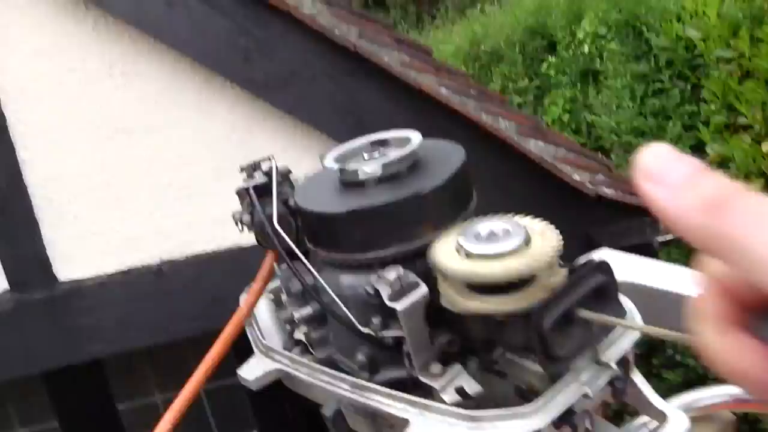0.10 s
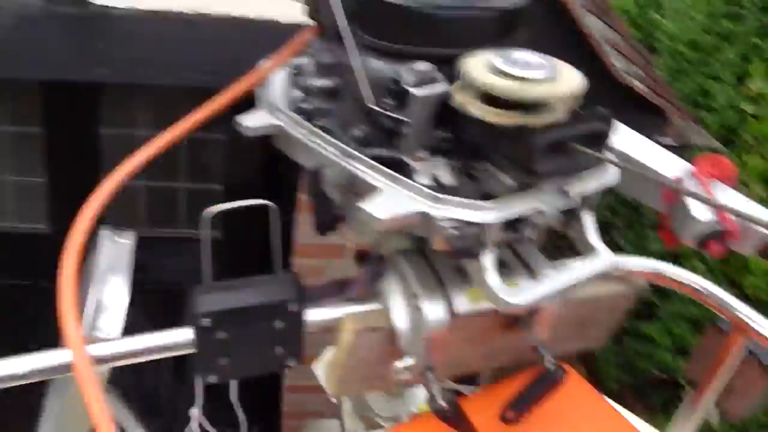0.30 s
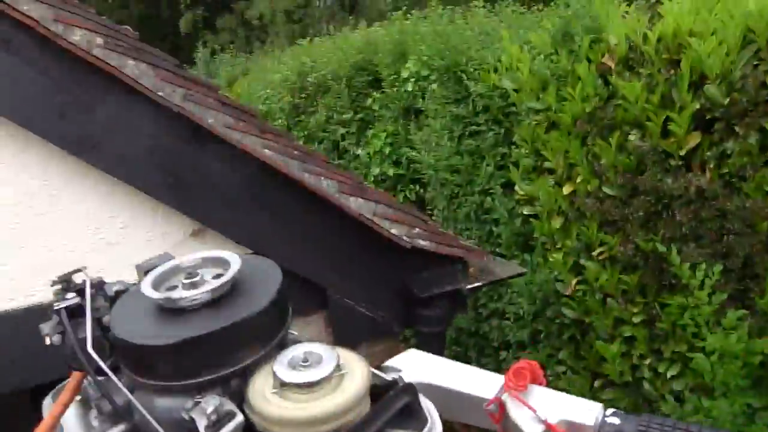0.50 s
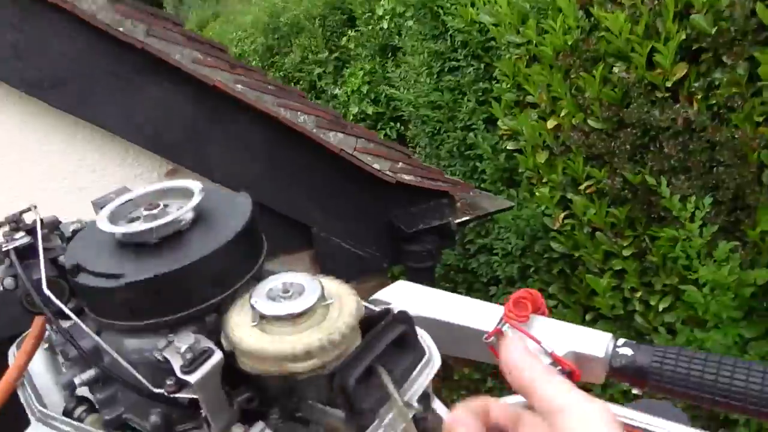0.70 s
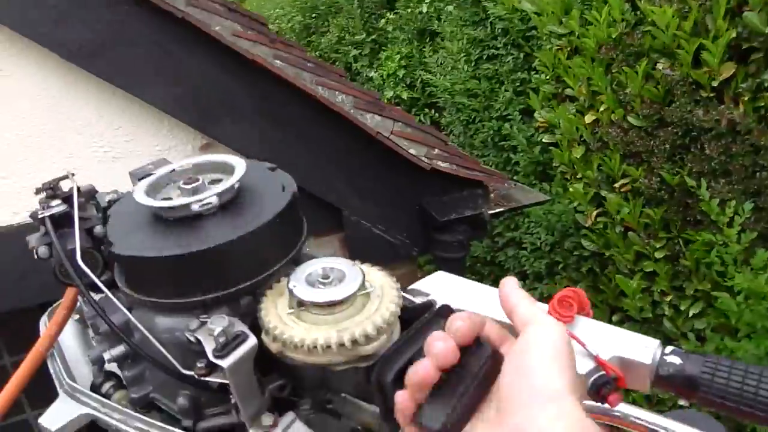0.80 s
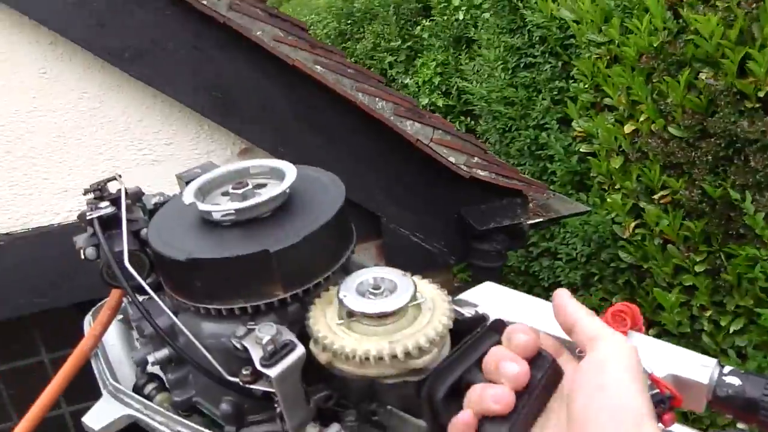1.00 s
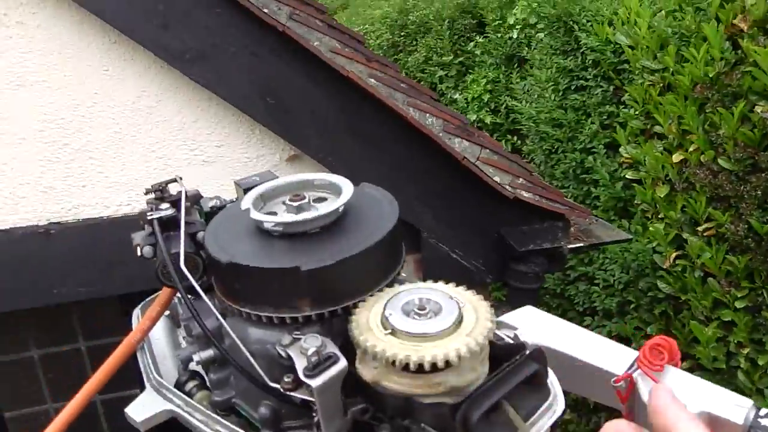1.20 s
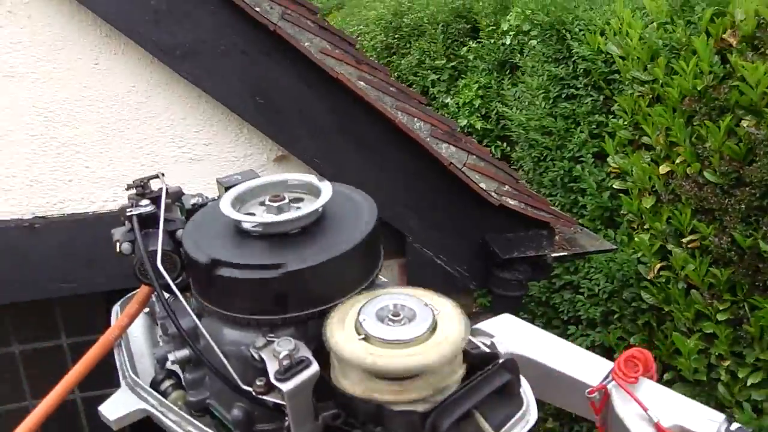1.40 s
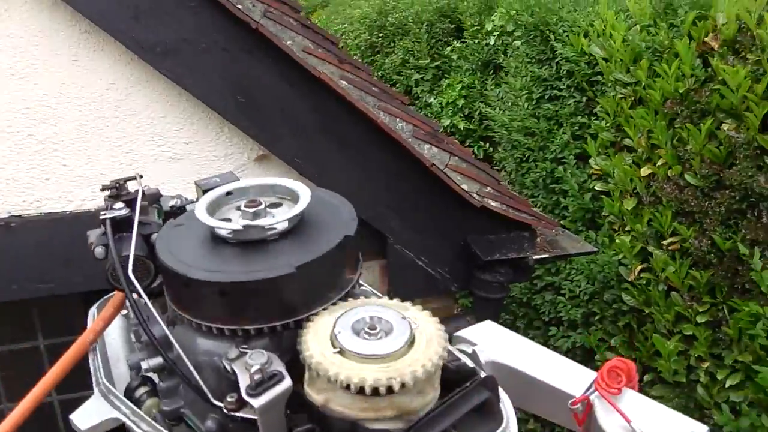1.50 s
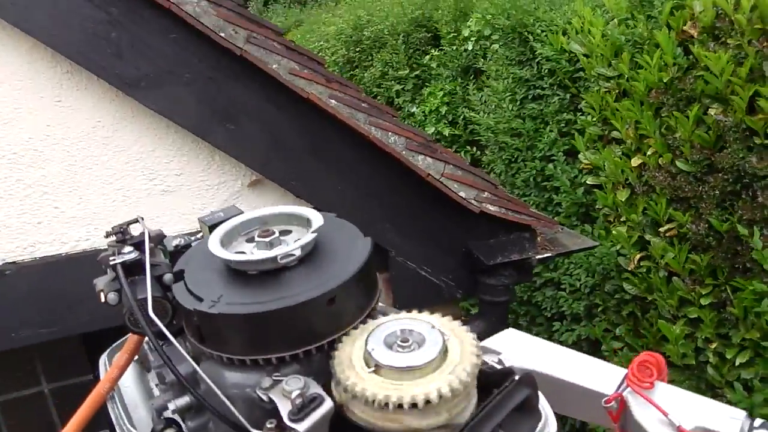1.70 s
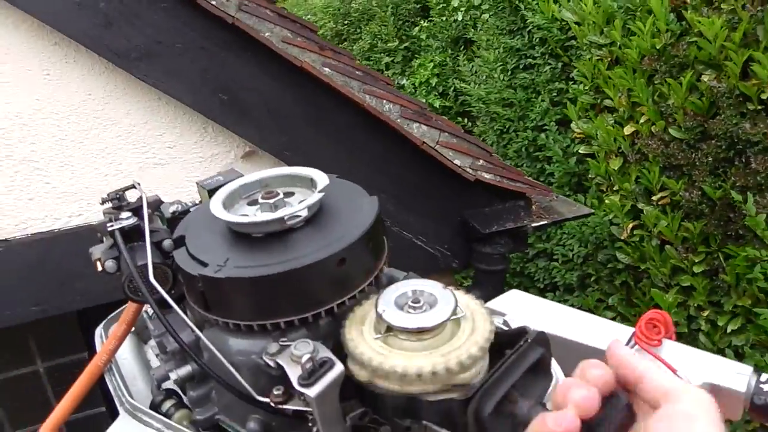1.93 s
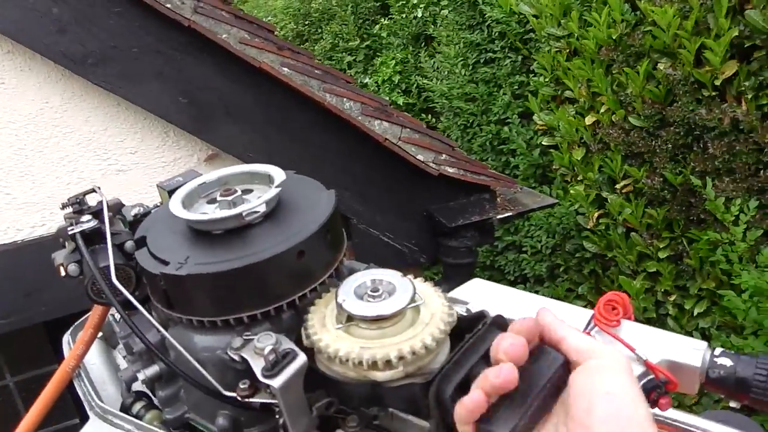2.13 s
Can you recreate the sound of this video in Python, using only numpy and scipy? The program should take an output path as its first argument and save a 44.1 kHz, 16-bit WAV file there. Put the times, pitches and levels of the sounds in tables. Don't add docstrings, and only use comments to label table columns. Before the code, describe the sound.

Pull-start rope on a small engine: harsh ratcheting rattle, metal clacks, dull thumps, no ignition

```python
import sys
import numpy as np
from scipy import signal
from scipy.fft import rfft, irfft, next_fast_len
from scipy.io import wavfile
from scipy.ndimage import uniform_filter1d, map_coordinates

SR = 44100
rng = np.random.default_rng(int(sys.argv[2]) if len(sys.argv) > 2 else 0)


def linear_from_db(decibels):
    return 10 ** (np.asarray(decibels, float) / 20)


def file_out(sig):
    cols = np.atleast_2d(sig).T
    lim = np.clip(cols, -1, 1)
    pcm = np.round(lim * 32767).astype(np.int16)
    wavfile.write(sys.argv[1], SR, pcm)


N = 97020

# frequency in Hz, level in dB.
AIR_SPECTRUM = [(20, -22), (70, 6), (160, 1.5), (600, -2), (1800, -3), (4500, -8.5), (9500, -19),
                (14000, -17)]
# centre in Hz, width in Hz, level in dB.
HISS_BANDS = [(6140, 230, -48), (7060, 1200, -42), (11460, 660, -46)]
# time in seconds, level in dB.
FLOOR_LEVEL = [(0, -40.5), (.14, -36.5), (1.05, -45), (1.3, -41.5), (1.7, -38.5), (2.2, -43)]

# start in seconds, contact in ms, treble in dB, casting in dB, favoured casting pitch in Hz.
FIRST_CLACKS = [(.106, 6.4, -76, -39, 3070), (.153, 3.5, -59, -26, 2770), (.1615, 1.4, -24, -21.5, 2440),
                (.193, 2.7, -21, -20.5, 2300), (.4728, 5.9, -12, -15, 3500),
                (.4925, 14.6, -12.5, -17.5, 3560), (.5731, 1.1, -16, -17, 1250),
                (.595, 10, -15.5, -38, 3050), (.6025, 0.79, -38, -18, 3120), (.6295, 1.63, -46, -7, 2250),
                (.6379, 15.3, -12, -11.5, 2070), (.7447, 1.4, -18, -25, 2080), (.796, 1.9, -49, -24, 2270),
                (.8096, 2.6, -10.5, -15, 3300), (.8465, 1.2, -19.5, -21, 2510),
                (.873, 1.2, -40, -27.5, 2720), (.9023, 0.65, -13.5, -18, 2620)]
LATER_CLACKS = [(1.1428, 4.6, -20.5, -30, 2460), (1.2535, 3.8, -15.5, -26, 1110),
                (1.2558, 5.8, -19, -23.5, 3660), (1.555, 1.1, -21.5, -32, 1600),
                (1.7554, 4.5, -28.5, -22, 2770), (1.7858, 2.4, -24.5, -24, 2770),
                (1.861, 3.1, -45, -16.5, 1740), (1.812, 8, -40, -24, 1270), (1.8662, 10, -14, -18, 3700),
                (2.0807, 3.4, -30.5, -28, 2900), (2.09, 1.1, -58, -28, 2520), (2.103, 3.2, -42, -28, 1690)]
# start in seconds, frequency in Hz, level in dB, T60 in seconds.
PINGS = [(.46, 12750, -17, 0.026), (.494, 14500, -20, 0.07), (1.866, 14200, -7, 0.014),
         (2.08, 10670, -23.5, 0.019)]

# centre in Hz, width in Hz, level in dB.
CASTING_MODES = [(558, 183, 0.5), (698, 95, 5), (930, 26, 2.5), (1110, 192, 2), (1393, 27, 2),
                 (1632, 145, 0), (2070, 99, 3), (2250, 102, 5), (2455, 122, 3.5), (2900, 66, 4.5),
                 (3182, 69, 3.5), (3404, 520, 3.5), (3773, 43, 2.5)]
# centre in Hz, width in Hz, level in dB.
BRIGHT_MODES = [(4970, 1480, 4), (6800, 83, 2.5), (7570, 75, 1), (10210, 710, 7), (10420, 1280, 1),
                (14200, 600, -2.5)]
# frequency in Hz, level in dB.
SIZZLE_SPECTRUM = [(3500, 7.5), (4600, -7), (5400, 3), (7000, -5), (8100, -1.5), (12000, -6), (14300, -12),
                   (16000, -12)]

# time in seconds, treble in dB, casting in dB over the treble, loudest casting pitch in Hz.
PULL = [
    (.12, -93, -45, 2450),
    (.155, -38.5, 14, 1250),
    (.2, -32, 7, 1560),
    (.235, -20, 4.5, 1780),
    (.28, -20, 2.5, 1690),
    (.37, -20.5, 2, 1840),
    (.415, -20, 3.5, 1110),
    (.445, -25, 2.5, 1620),
    (.47, -26, -1, 1520),
]
COAST = [
    (0.487, -37.5, 15.4, 1710),
    (.6, -30.5, 2.4, 1800),
    (.67, -30.5, 2.8, 2630),
    (0.749, -35, 8.1, 1370),
    (0.889, -41.5, 8.3, 1310),
]
REWIND = [
    (0.881, -48, 20.4, 2500),
    (0.906, -29, 11.2, 2470),
    (.94, -23, 2.8, 2700),
    (0.961, -28.5, 6.1, 2530),
    (0.978, -39, 9.6, 2480),
    (1.003, -47.5, 7.8, 930),
    (1.071, -56, 4.6, 740),
]
DRAW = [
    (1.3, -60, 13, 1640),
    (1.368, -46, 8.2, 1680),
    (1.45, -38.5, 7.3, 1520),
    (1.53, -34, 9.1, 1560),
    (1.567, -42.5, 19, 1540),
    (1.62, -39, 5.6, 1330),
    (1.67, -93, 11, 1530),
]
SETTLE = [
    (1.72, -57.5, 14.5, 2040),
    (1.811, -46.5, 17.7, 1290),
    (1.85, -44, 6.9, 2200),
    (1.96, -40.5, 1.1, 3080),
    (2.101, -49.5, 1.4, 2500),
]

# start in seconds, level in dB, frequency in Hz, T60 in seconds.
THUMPS = [(0.169, -15.5, 83.3, 0.15), (0.217, -34, 93, 0.069), (0.285, -4.5, 111.3, 0.11),
          (.408, -4.5, 112, 0.098), (0.573, -21, 85, 0.098), (1.61, -21.5, 79, 0.14),
          (1.771, -0.5, 104.2, 0.14), (1.835, -12.5, 101, 0.084), (1.866, -18.5, 160, 0.086),
          (1.9, -29.5, 97.4, 0.19), (0.469, -20.5, 84, 0.2)]
# ratio to its frequency, level in dB.
OVERTONES = [(0.999, -3), (1.75, -6.5), (2.65, -9)]
# start in seconds, end in
# seconds, first Hz, last Hz, level in dB rms.
WHINES = [(.21, 0.315, 2083, 1928, -21.5), (0.225, 0.299, 1495, 1700, -16), (0.295, .42, 1650, 1620, -22.5),
          (0.305, 0.405, 2600, 2550, -22.5), (0.394, 0.439, 1080, 1123, -23), (0.36, 0.39, 736, 690, -32),
          (0.488, 0.519, 3600, 3720, -21.5), (0.494, 0.523, 2674, 2715, -15.5),
          (0.889, 0.984, 2075, 2350, -21), (0.921, 0.974, 2700, 2830, -18.5),
          (0.892, 0.943, 3145, 3187, -25), (0.942, 1.065, 903, 711, -46), (1.24, 1.55, 112, 118, -48.5),
          (1.349, 1.519, 777, 713, -38), (1.479, 1.621, 620, 492, -36.5), (1.514, 1.588, 1543, 1692, -26),
          (1.337, 1.503, 3050, 3060, -40.5)]
# (Hz, peak dB).
STRUCK_PARTS = [(0.4732, 0.039, [(900, -10), (1110, -4.5), (1330, -7), (2170, -11), (2650, -10),
                (3010, -14)]), (0.601, 0.016, [(2650, -22), (3010, -5.5)]), (0.7052, 0.025, [(2050, -23),
                (3300, -17)]), (.7215, 0.021, [(1150, -14)]), (.7455, 0.013, [(2100, -7.5), (3400, -10),
                (3870, -5.5)]), (.8105, 0.03, [(942, -10.5), (1620, -17), (2240, -8.5), (3190, -8.5)]),
                (0.873, 0.024, [(2100, -17), (2900, -27), (3850, -18)]), (1.1435, 0.046, [(1420, -32),
                (2120, -25), (2560, -27), (3870, -27)]), (1.2554, 0.029, [(400, -22.5), (614, -19.5),
                (1130, -7.5), (1510, -8), (2000, -9.5), (3330, -18)]), (1.2708, 0.025, [(1200, -25)]),
                (1.7562, 0.044, [(930, -26.5)]), (1.786, 0.04, [(680, -14), (900, -20), (2700, -21),
                (3800, -23.5)])]
# frequency in Hz, level in dB, T60 in seconds.
CUP_MODES = [(2545, 0, .19), (2580, -6, .14), (2777, -3, .16), (3125, -13, .17), (3340, -5, .035),
             (4000, -20, .15), (5700, -27, .2), (6800, -27, .2), (10150, -27, .2)]

# frequency in Hz, level in dB.
SIDE_SPECTRUM = [(60, -22), (200, -16), (1300, -33), (3000, -27), (5500, -18), (14000, -9)]
# frequency in Hz, difference in dB.
LEAN_SPECTRUM = [(1500, 0.3), (5000, -1.5), (14000, -2.8)]

SPLIT_HZ = 4080


def unit(x):
    return x / np.sqrt(np.mean(x ** 2) + 1e-20)


def along(points, hz):
    f, v = np.transpose(points)
    return np.interp(np.log(hz + 1), np.log(f + 1), v)


def filtered(x, response):
    m = next_fast_len(N + 8192)
    return irfft(rfft(x, m) * response(np.fft.rfftfreq(m, 1 / SR)), m)[..., :N]


def resonances(peaks):
    def response(f):
        total = 0
        for k, (centre, width, db) in enumerate(peaks):
            band = 1j * f * width
            total = total + (-1) ** k * linear_from_db(db) * band / (centre * centre - f * f + band)
        return total
    return response


def wobble(rate):
    knots = rng.standard_normal(int(N * rate / SR) + 4)
    return map_coordinates(knots, [np.arange(N) * rate / SR])


def since(start):
    return np.maximum(np.arange(N) / SR - start, 0)


def emphasis_db(hz, focus_hz, octaves):
    off = np.log2(hz / focus_hz)
    return 6 * np.exp(-(off / 0.25) ** 2) - 11.4 * (off / octaves) ** 2


def garden():
    patch_db, swell_db = 3, 2
    air = unit(filtered(rng.standard_normal(N), lambda f: linear_from_db(along(AIR_SPECTRUM, f))))
    cells = signal.stft(air, nperseg=512)[2]
    patches = uniform_filter1d(rng.standard_normal(cells.shape), size=6, axis=0)
    patches = uniform_filter1d(patches, size=24, axis=1)
    air = unit(signal.istft(cells * linear_from_db(patch_db * unit(patches)), nperseg=512)[1][:N])
    hiss = 0
    for centre, width, db in HISS_BANDS:
        swell = linear_from_db(db + 32 + swell_db * wobble(7.07))
        band = filtered(rng.standard_normal(N), lambda f: resonances([(centre, width, 0)])(f) ** 2)
        hiss = hiss + swell * unit(band)
    s, db = np.transpose(FLOOR_LEVEL)
    return linear_from_db(np.interp(np.arange(N) / SR, s, db) + 1.2 * wobble(7.75)) * (air + hiss)


def clacks():
    clack_t60, knock_t60, rise_s = 0.022, 0.013, 0.00024
    first_blow, luck_db, knock_low_hz = 5, 2, 800
    bright, knock, t = np.zeros(N + SR), np.zeros(N + SR), np.arange(SR // 10) / SR
    for s, ms, treble_db, body_db, focus_hz in list(FIRST_CLACKS) + list(LATER_CLACKS):
        i = round(s * SR)
        after = np.maximum(t - ms / 1000, 0)
        chatter = rng.standard_normal((2, len(t))) * (1 - np.exp(-t / rise_s))
        bright[i:][:len(t)] += linear_from_db(treble_db - 60 * after / clack_t60) * chatter[0]
        ring = 0
        for centre, width, db in CASTING_MODES:
            mode_db = db + luck_db * rng.standard_normal() + emphasis_db(centre, focus_hz, 1)
            ring = ring + linear_from_db(mode_db) * np.sin(2 * np.pi * centre * t)
        force = (chatter[1] + first_blow * (t == 0))[:int(ms * SR / 1000) + 2]
        hit = np.convolve(force, ring * linear_from_db(-60 * t / knock_t60))[:len(t)]
        loudness = np.sqrt(np.mean(hit[:int((ms + 4) * SR / 1000)] ** 2))
        knock[i:][:len(t)] += linear_from_db(body_db) * hit / loudness
    colour = lambda f: (resonances(BRIGHT_MODES)(f) + 0.12) * 1.35 * (1j * f / (3500 + 1j * f)) ** 2
    low_cut = lambda f: (1j * f / (knock_low_hz + 1j * f)) ** 3
    return filtered(bright[:N], colour) + filtered(knock[:N], low_cut)


def rattle(stroke):
    teeth_per_s, scatter_db, rub_db = 330, 4, 2
    drift_db, focus_oct, skirt_db = 2.5, 1.866, -13.5
    stand_hz, stand_width_hz, stand_db = 112, 16, -23.5
    s, *cols = np.transpose(stroke)
    t = np.arange(N) / SR
    treble_db, body_db, focus_hz = [np.interp(t, s, c) for c in cols]

    count = int(teeth_per_s * N / SR)
    draw = rng.standard_normal((count, 2)).clip(-2, 2)
    at = (np.arange(count) + 0.5 + 0.48 * draw[:, 0]) * SR / teeth_per_s
    blows = np.bincount(at.astype(int).clip(0, N - 1), linear_from_db(scatter_db * draw[:, 1]), N)
    teeth = unit(np.convolve(blows, linear_from_db(-np.arange(60) * 1.05))[:N])
    noise = rng.standard_normal((2, N)) * linear_from_db(wobble(39.63))

    casting = 0
    for centre, width, db in CASTING_MODES:
        mode = resonances([(centre, width, db), (centre, 5.5 * width, db + skirt_db)])
        gain = linear_from_db(drift_db * wobble(24.53) + emphasis_db(centre, focus_hz, focus_oct))
        casting = casting + gain * filtered((teeth + linear_from_db(rub_db)) * noise[0], mode)
    casting = unit(casting)

    def sizzle_response(f):
        return linear_from_db(along(SIZZLE_SPECTRUM, f)) * (resonances(BRIGHT_MODES)(f) + 7.8) * (f > SPLIT_HZ * 0.9)

    sizzle = unit(filtered((teeth + linear_from_db(rub_db + 10)) * noise[1], sizzle_response))
    stand_mode = resonances([(stand_hz, stand_width_hz, 0)])
    stand = unit(filtered(noise[0], lambda f: stand_mode(f) ** 2))
    moving = (t > s[0]) * (t < s[-1])
    return moving * linear_from_db(treble_db) * (sizzle + linear_from_db(body_db) * (casting + linear_from_db(stand_db) * stand))


def piston():
    rise_s = 0.01
    out = 0
    for s, db, hz, t60 in THUMPS:
        t = since(s)
        boom = 0
        for ratio, partial_db in OVERTONES:
            level = linear_from_db(partial_db - 60 * t * (ratio - 1) * 0.35 / t60)
            boom = boom + level * np.sin(2 * np.pi * (hz * ratio * t + rng.random()))
        swell = 1 - np.exp(-(t / rise_s) ** 2)
        out = out + linear_from_db(db - 60 * t / t60 + 3.5 * wobble(60)) * swell * boom
    return out


def whines():
    wander_hz, steady = 65, 1.1
    out, t = 0, np.arange(N) / SR
    for start, end, first_hz, last_hz, db in WHINES:
        u = np.clip((t - start) / (end - start), 0, 1)
        hz = first_hz + (last_hz - first_hz) * u
        hz = hz + min(wander_hz, first_hz / 24) * wobble(150)
        level = linear_from_db(db) * (steady + wobble(min(140, first_hz / 8))) * np.sin(np.pi * u)
        out = out + level * np.sin(2 * np.pi * np.cumsum(hz) / SR)
    return out


def pings():
    out = 0
    for s, hz, db, t60 in PINGS:
        t = since(s)
        mode = resonances([(hz, hz / 22, 0)])
        band = unit(filtered(rng.standard_normal(N), lambda f: mode(f) ** 2))
        out = out + linear_from_db(db - 60 * t / t60) * (1 - np.exp(-t / 0.00095)) * band
    return out


def struck():
    out = 0
    for s, t60, modes in STRUCK_PARTS:
        t = since(s)
        ring = sum(linear_from_db(db) * np.sin(2 * np.pi * hz * t) for hz, db in modes)
        out = out + linear_from_db(-60 * t / t60) * (1 - np.exp(-t / 0.00043)) * ring
    return out


def cup():
    start_s, level_db, flutter_db = 0.6375, -1, 1.3
    sag, sag_s = 0.0445, 0.0072
    t = since(start_s)
    delay = sag * sag_s * (1 - np.exp(-t / sag_s))
    ring = 0
    for k, (hz, db, t60) in enumerate(CUP_MODES):
        level = linear_from_db(db - 60 * t / t60 + flutter_db * wobble(92.0))
        ring = ring + level * np.sin(2 * np.pi * hz * (t - (k < 2) * delay))
    return linear_from_db(level_db) * ring * (1 - np.exp(-t / 0.0011))


def scene():
    mid = garden() + clacks() + sum(rattle(stroke) for stroke in [PULL, COAST, REWIND, DRAW, SETTLE])
    mid = mid + piston() + whines() + pings() + struck() + cup()
    turn = rng.uniform(0, 2 * np.pi, 1200)
    scatter = lambda f: linear_from_db(along(SIDE_SPECTRUM, f)) * np.exp(1j * turn[(f / 20).astype(int)])
    side = filtered(mid, scatter)
    lean = lambda f: linear_from_db(along(LEAN_SPECTRUM, f) * [[0.5], [-0.5]])
    return filtered(np.array([mid + side, mid - side]), lean)


def roll_off(x):
    return signal.sosfilt(signal.butter(12, 16460, fs=SR, output="sos"), x)


def record(dry):
    split_width_hz, bass_lag_s, top_hz = 106, 0.0218, 16100
    low = lambda f: 1 / (1 + np.exp(np.clip((f - SPLIT_HZ) / split_width_hz, -40, 40)))
    bass = filtered(dry, lambda f: np.sqrt(low(f)))
    bass = np.roll(bass, round(bass_lag_s * SR), axis=1)
    treble = filtered(dry, lambda f: np.sqrt(1 - low(f)) * np.clip((top_hz - f) / 900, 0, 1))
    mix = np.clip(bass + treble, -1, 1)
    return roll_off(mix)


dry = scene()
out = record(dry)
file_out(out)
```